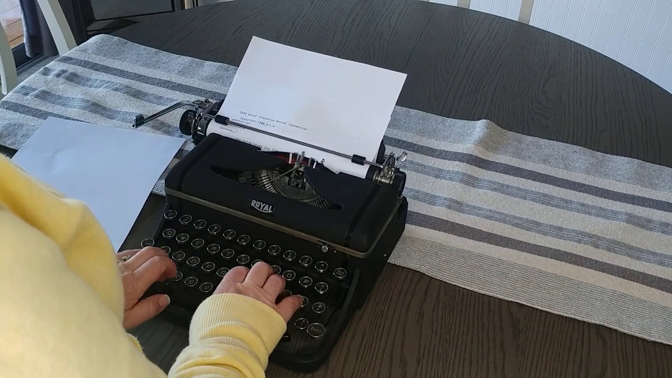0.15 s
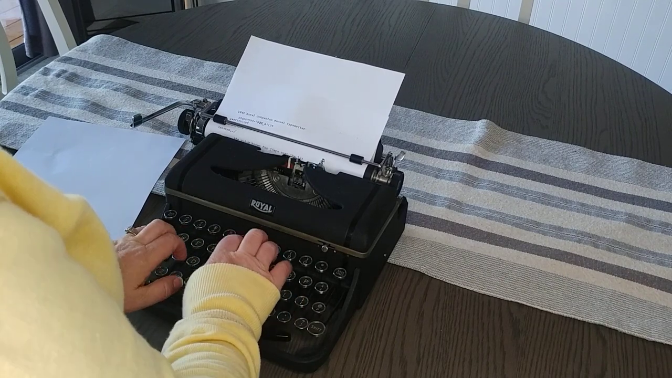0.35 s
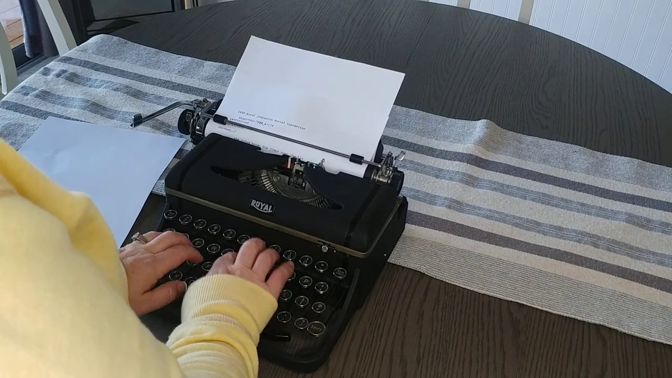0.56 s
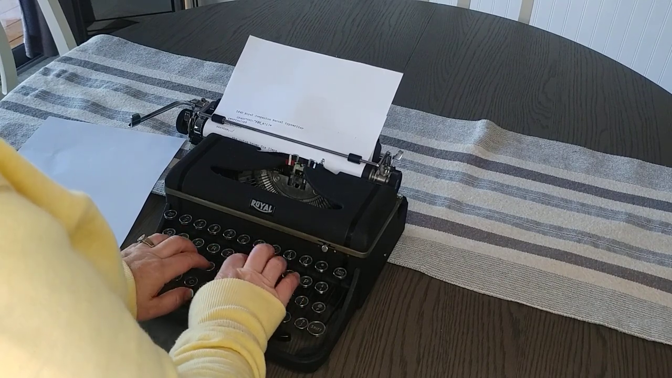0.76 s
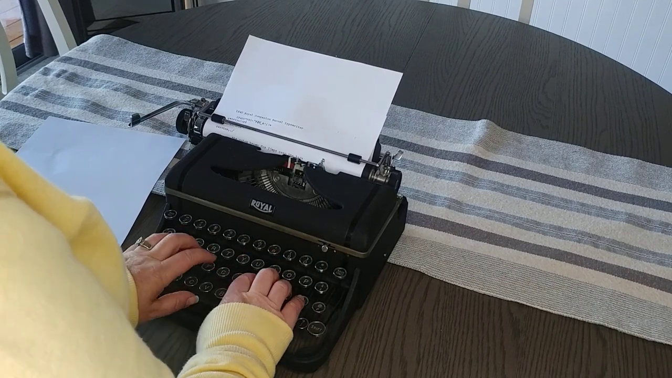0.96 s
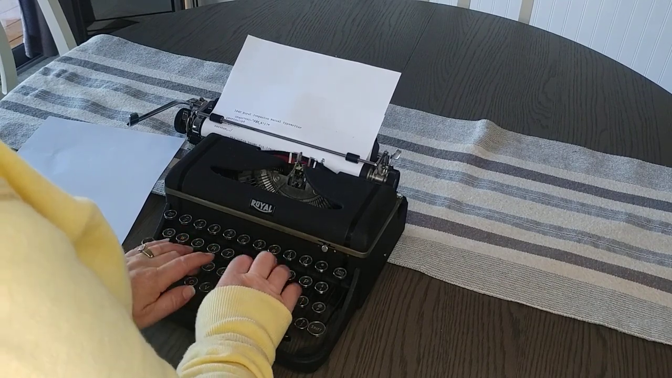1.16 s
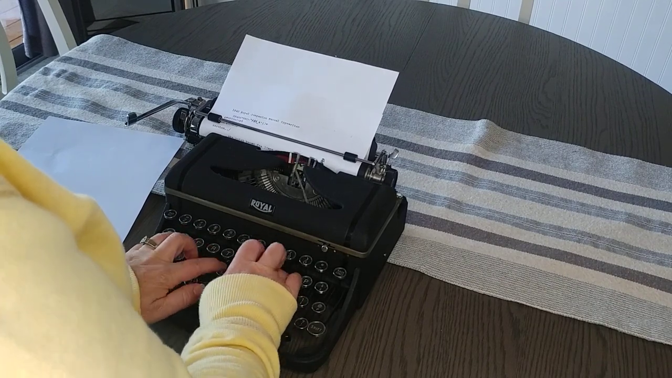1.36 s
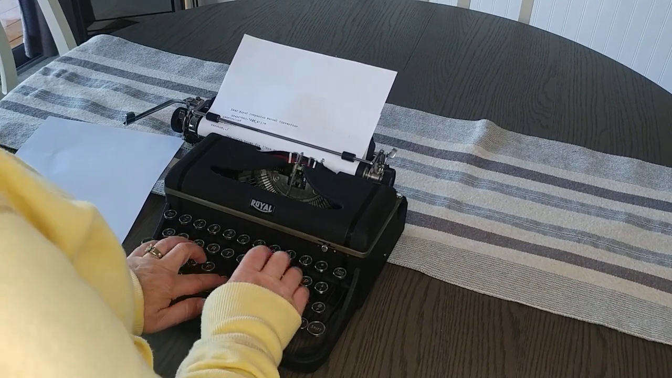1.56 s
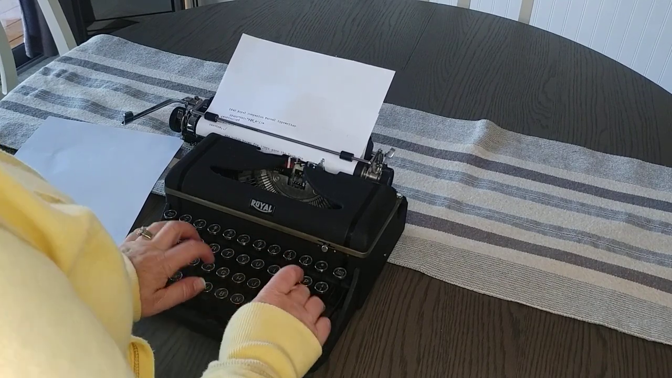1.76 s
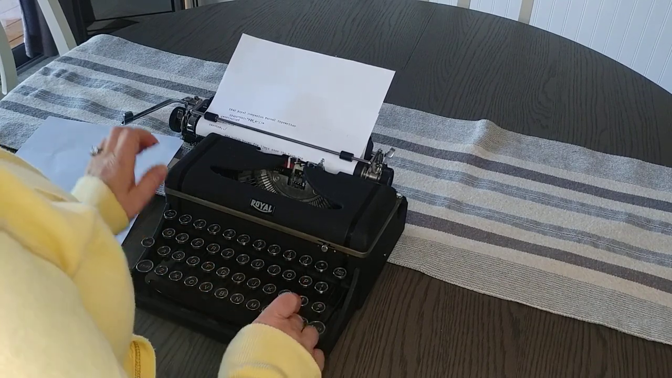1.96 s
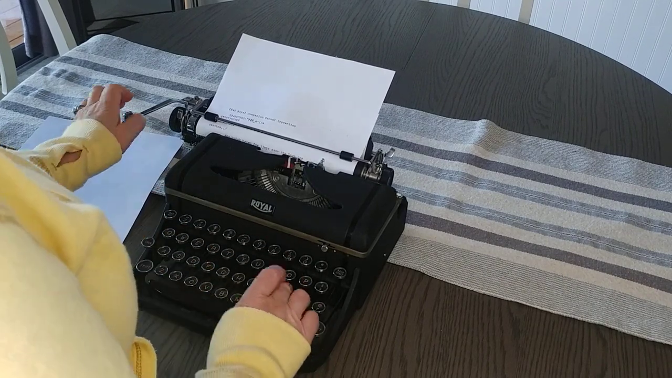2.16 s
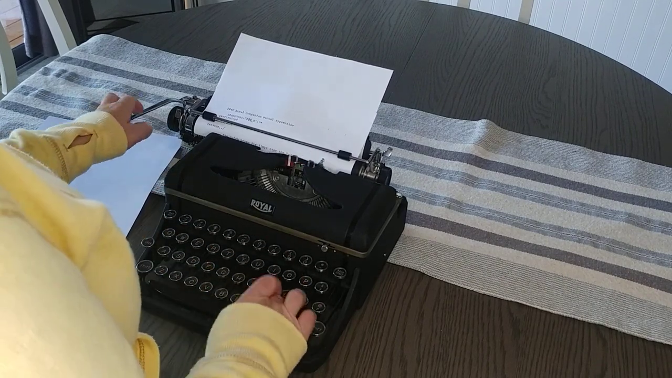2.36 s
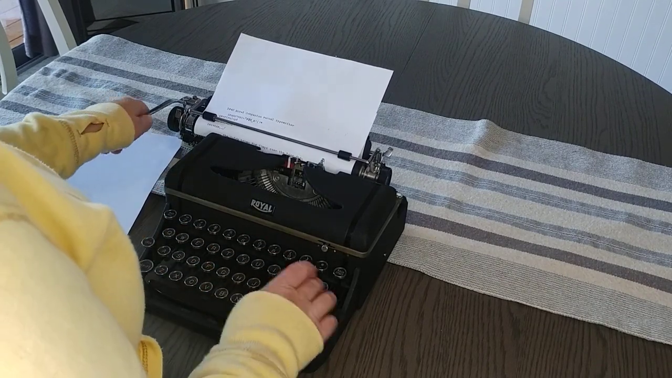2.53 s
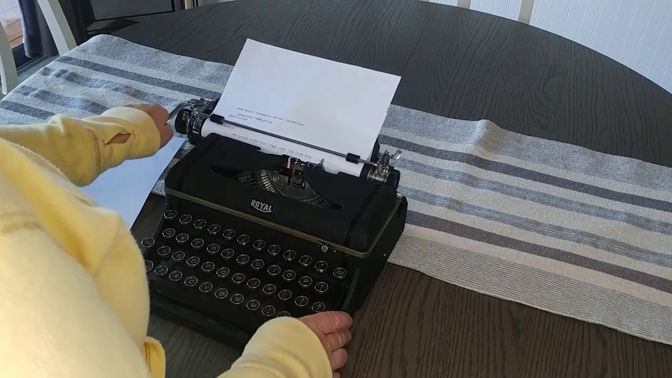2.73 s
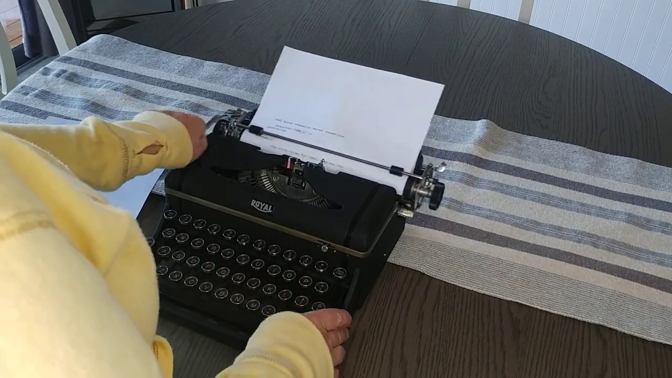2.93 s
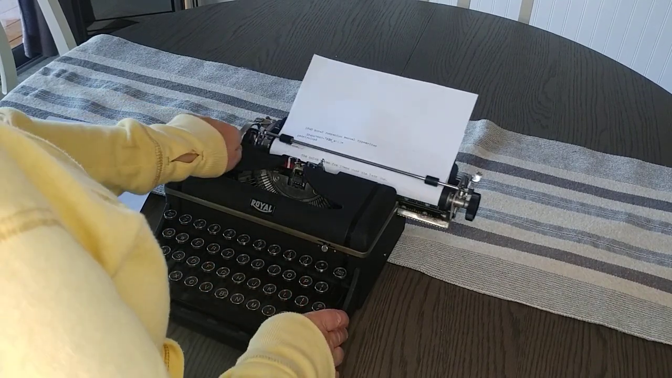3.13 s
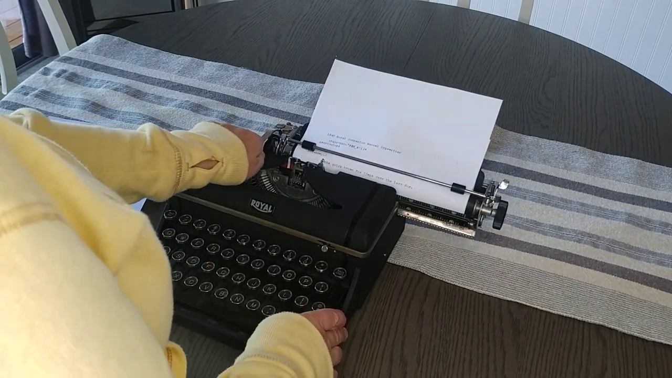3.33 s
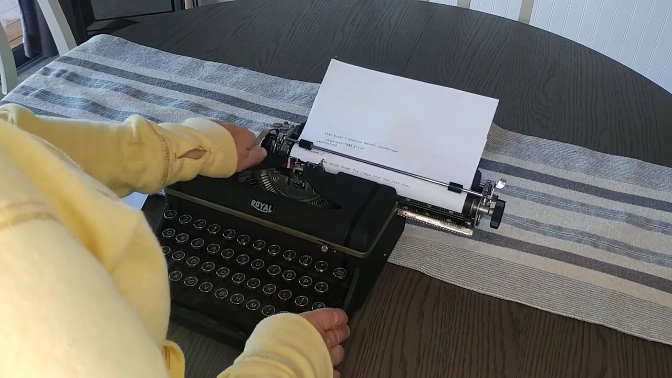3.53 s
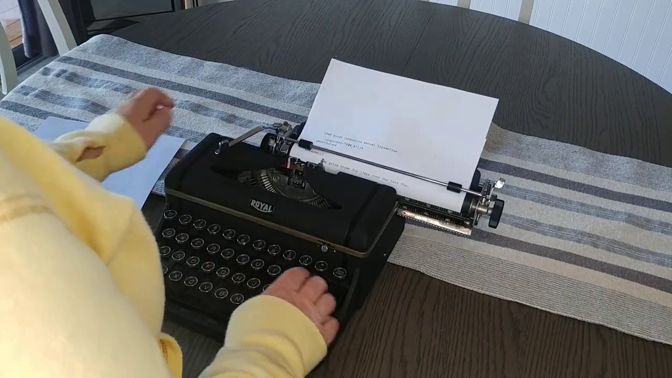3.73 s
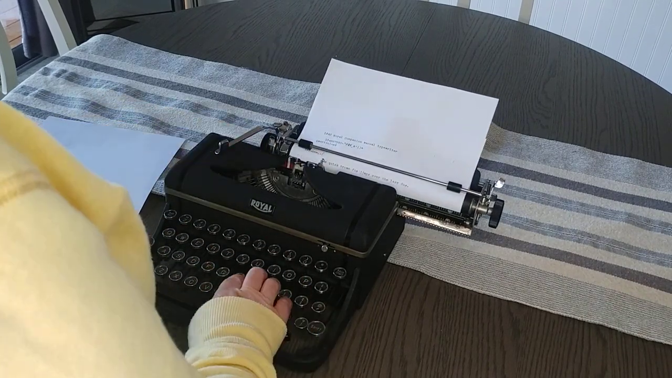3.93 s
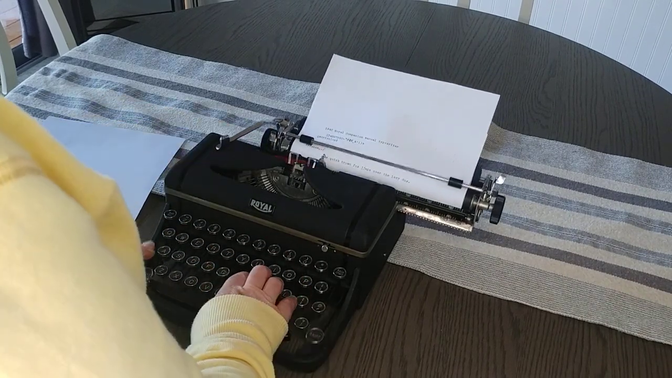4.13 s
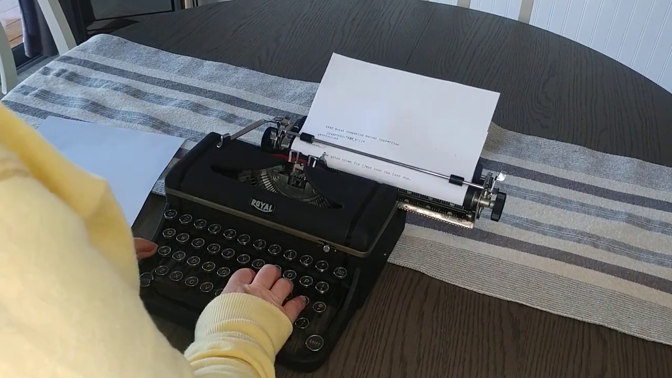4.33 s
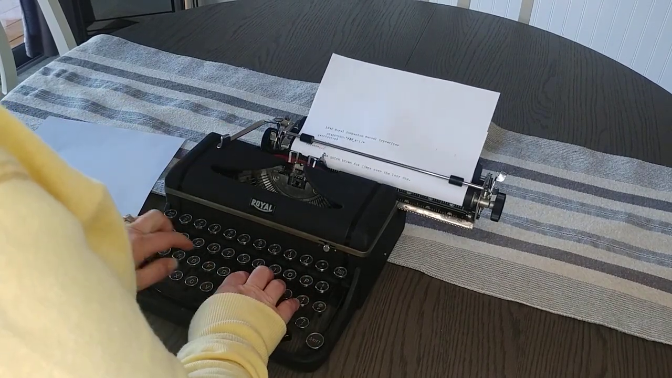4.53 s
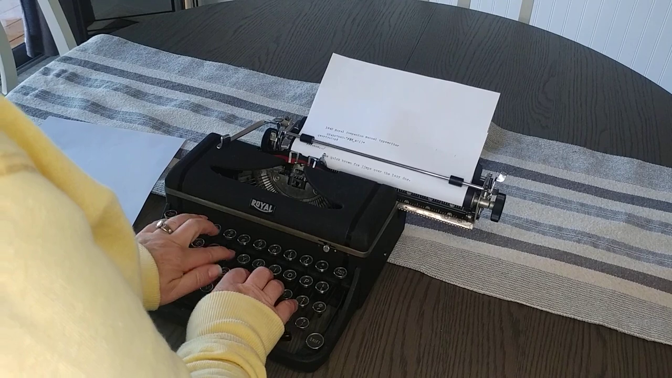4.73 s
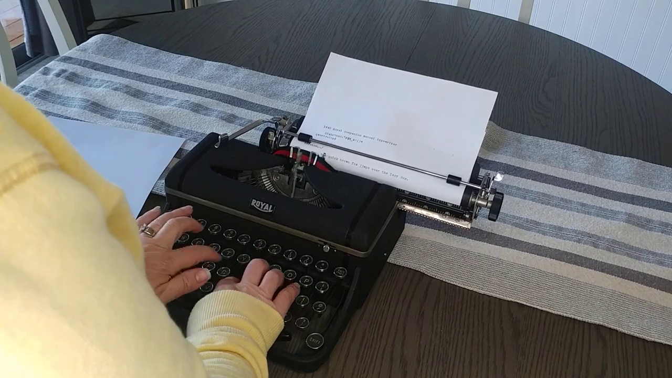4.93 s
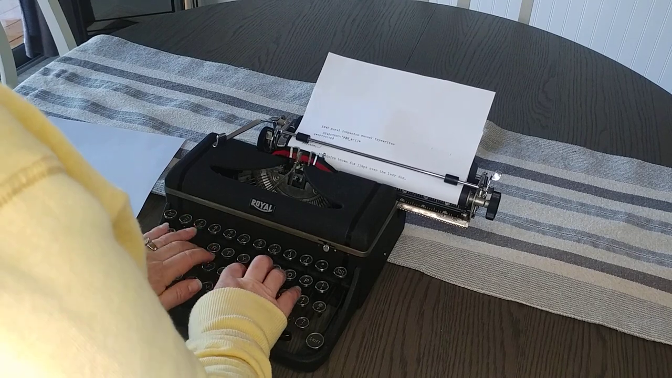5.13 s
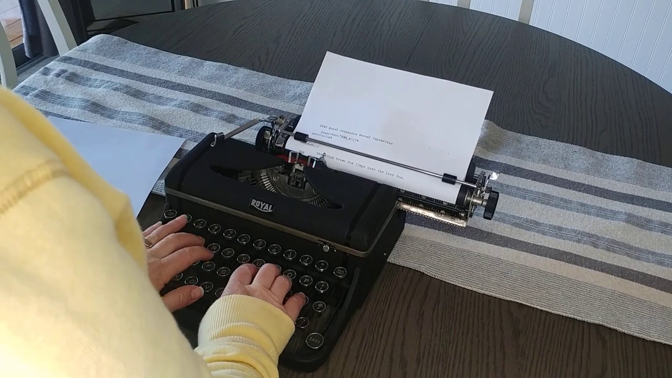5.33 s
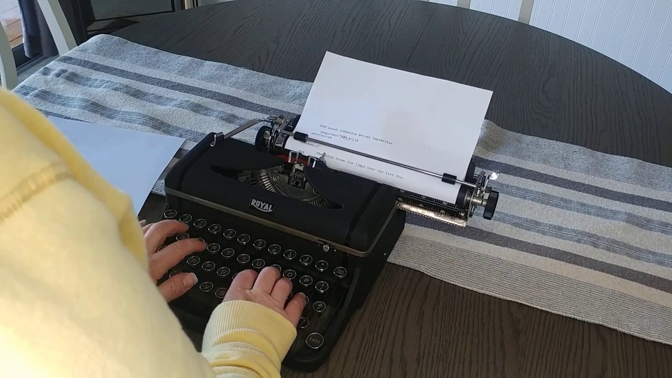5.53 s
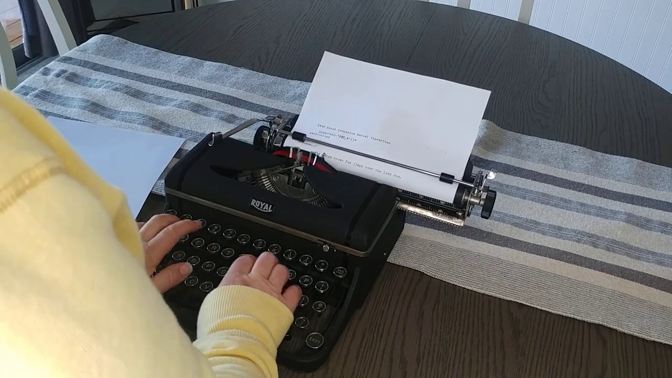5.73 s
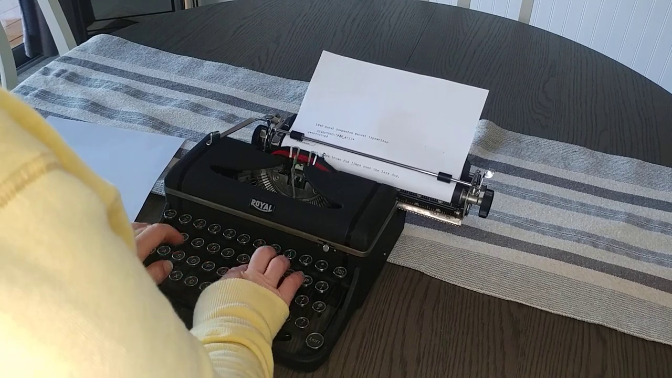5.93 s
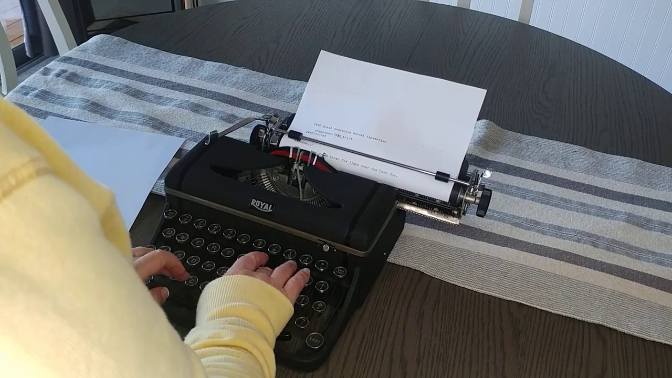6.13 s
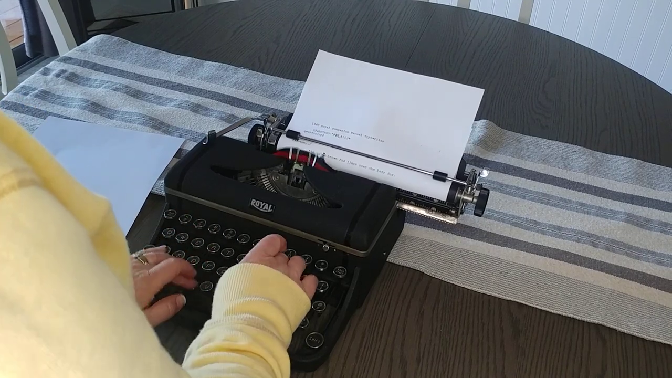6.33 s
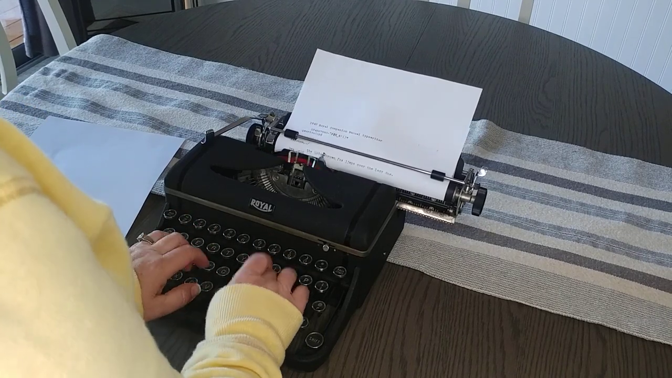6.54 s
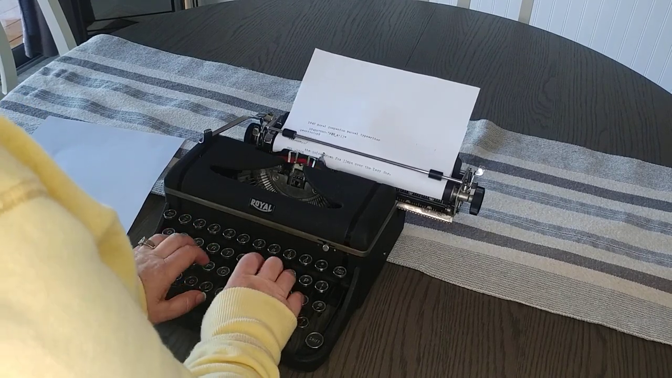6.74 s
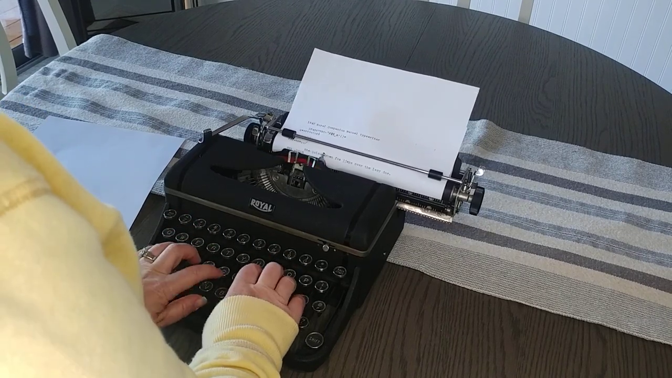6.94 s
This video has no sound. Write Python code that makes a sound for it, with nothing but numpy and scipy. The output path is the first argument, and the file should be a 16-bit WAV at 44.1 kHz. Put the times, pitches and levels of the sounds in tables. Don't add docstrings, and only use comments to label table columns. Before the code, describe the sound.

A manual typewriter clacks in uneven sharp strikes, its carriage is slid back with a soft ratchet, a shift slam, then faster typing resumes.

```python
import sys
import numpy as np
from scipy import signal
from scipy.fft import rfft, irfft
from scipy.io import wavfile
from scipy.ndimage import uniform_filter1d

SR = 44100
rng = np.random.default_rng(int(sys.argv[2]) if len(sys.argv) > 2 else 0)


def rack_gain(trim_db):
    fader = np.asarray(trim_db, float)
    return 10 ** (fader / 20)


def bounce(signal):
    frames = np.transpose(np.atleast_2d(signal))
    limited = np.clip(frames, -1, 1)
    pcm = np.round(limited * 32767).astype(np.int16)
    wavfile.write(sys.argv[1], SR, pcm)


N = 312228
LEAD_S = .1

# (time [s], crack peak [dB], steel over paper slap [dB], frame ring [dB],
# table jolt [dB])
STRIKES = [(0.2484, -2.5, .5, -40.5, -43), (0.6765, 1.2, 2.5, -36, -41), (1.2191, 0, -1.5, -38, -47),
           (1.3829, 2.2, -.6, -38, -47), (1.6326, 1.5, .3, -36.5, -46), (2.3523, -2.5, -10.5, -35.5, -37),
           (4.8543, .3, 3.5, -34, -35), (5.0125, 1.5, 3, -35.5, -37), (5.207, 0, 2.5, -34.5, -42),
           (5.7509, -1.2, 1.5, -34, -41), (5.9782, -1, .6, -34.5, -39), (6.2107, -1.2, 2.2, -34, -44),
           (6.4354, -.5, 1.4, -33.5, -41), (6.658, -0.5, .4, -33.5, -42)]
# (time [s], frame ring [dB], thud [dB], table jolt [dB])
CLUNKS = [(0.063, -30, -47, -42), (0.378, -30, -45, -43), (0.64, -38, -42, -43), (0.789, -30, -49, -42),
          (0.943, -43, -43, -47), (1.094, -31, -42, -43), (1.352, -30, -43, -46), (1.502, -31, -45, -42),
          (1.774, -32, -46, -44), (2.333, -29, -43, -38), (2.444, -32, -45, -45), (3.633, -32, -43, -42),
          (4.103, -46, -51, -48), (4.954, -26, -45, -38), (5.124, -27, -42, -41), (5.359, -27, -46, -41),
          (5.478, -41, -43, -47), (5.657, -29, -41, -42), (5.917, -30, -44, -41), (6.075, -27, -39, -42),
          (6.348, -29, -45, -42), (6.564, -28, -41, -44), (6.774, -29, -43, -46), (6.875, -41, -39, -45),
          (7.047, -29, -40, -44)]
# (frequency [Hz], level [dB], time to fall 60 dB [s])
FRAME = [(286, -14, .08), (330, -12, .07), (382.5, -2, .1), (447.8, -6, .09), (500, -7.5, .07),
         (545, -8, .07), (592, -8, .07), (642, -7.5, .09), (670.7, -1, .1), (710, -7, .07), (780, -11, .06),
         (864, -9, .06), (960, -9, .05), (1087, -9.5, .05), (1220, -12.5, .05), (1554, -18, .05),
         (1830, -24.5, .05)]
# (frequency [Hz], level per Hz [dB])
RATTLE = [(530, -31), (900, -4), (1360, -15), (1780, -4.5), (3270, -4), (4430, -10), (4830, -9),
          (9200, -4.5), (10500, -16), (14800, -16.5), (15900, -22), (16500, -35.5)]
FELT = .62
RIGHT_LAG = 3


def unit(x):
    return x / np.sqrt(np.mean(x ** 2))


def response(spectrum):
    hz, db = np.transpose(spectrum)
    grid_hz = np.linspace(1, SR / 2, 2049)
    log_gain = np.interp(np.log(grid_hz), np.log(hz), db) * np.log(10) / 20
    cepstrum = irfft(log_gain)
    cepstrum[1:2048] *= 2
    cepstrum[2049:] = 0
    taps = irfft(np.exp(rfft(cepstrum)))
    return taps / np.linalg.norm(taps)


def band(x, lo_hz, hi_hz):
    sos = signal.butter(2, [lo_hz, min(hi_hz, .45 * SR)], "band", fs=SR, output="sos")
    return signal.sosfilt(sos, x)


def burst(ms, grain_db=2.5):
    t_ms = np.arange(2048) / SR * 1000
    contacts = rng.standard_normal(2048) * rack_gain(grain_db * rng.exponential(size=2048))
    return unit(contacts) * np.exp(-t_ms / max(ms, .1))


def ring(modes, scatter_db, detune=.012, size=6000, damp=1):
    hz, db, t60 = np.transpose(modes)[:, :, None]
    pitch_chance, level_chance = rng.standard_normal((2, len(modes), 1))
    t = np.arange(size) / SR
    tones = np.sin(2 * np.pi * hz * (1 + detune * pitch_chance) * t)
    fade = np.exp(-np.log(1000) * t / (damp * t60))
    total = np.sum(rack_gain(db + scatter_db * level_chance) * tones * fade, axis=0)
    return total / np.sqrt(np.mean(total[:600] ** 2))


def pushed(body, ms):
    push = burst(ms) * (1 - np.exp(-np.arange(2048) / 260.0))
    return signal.fftconvolve(body, push / np.linalg.norm(push))


def add(track, s, x):
    i = max(int((s + LEAD_S) * SR), 0)
    track[..., i:i + x.shape[-1]] += x[..., :track.shape[-1] - i]


def read(curve):
    s, first, *rest = np.transpose(curve)
    t = np.arange(s[0], s[-1], 1 / SR)
    return [s[0], rack_gain(np.interp(t, s, first))] + [np.interp(t, s, c) for c in rest]


def stereo_noise(size, wide=1.04):
    mid, side = rng.standard_normal((2, size))
    side = wide * signal.lfilter(*signal.butter(1, 911, "high", fs=SR), side)
    return np.array([mid + side, mid - side]) / np.sqrt(2)


def typebars(track):
    # (frequency [Hz], level per Hz [dB])
    crack_colour = [(500, -40), (900, -20), (1500, -17), (2200, -11), (3000, -5), (4200, -3), (5500, -4),
                    (7000, -7), (8300, -2), (9500, 0), (10500, -9), (12500, -17), (15300, -22),
                    (16500, -40)]
    earlier_strike = (-.07, 2, 0, -38, -48)
    pan_db = .6
    slug = response(crack_colour)[:512]
    for s, db, tilt_db, frame_db, _ in [earlier_strike] + list(STRIKES):
        blow = .065 * burst(.7)
        blow[0] += 1
        crack = signal.lfilter(slug, 1, blow)
        crack += ((rack_gain(-tilt_db / 2) - 1) * band(crack, 2500, 5500)
                  + (rack_gain(tilt_db / 2) - 1) * band(crack, 7000, 16000))
        add(track, s + .0006, rack_gain(db + 9.3) * crack * rack_gain([[pan_db / 2], [-pan_db / 2]]))
        frame = ring(FRAME, scatter_db=1.6, damp=FELT)
        add(track, s + .006, rack_gain(frame_db - 1.6) * pushed(frame, 20.0))


def linkage(track):
    # (frequency [Hz], level [dB], time to fall 60 dB [s])
    thud = [(102, -2, 0.1), (130, 0, 0.16), (178.1, 0, .18), (215, -6, 0.12)]
    # (time [s], peak [dB], 1.5-1.9 kHz against peak [dB], length [ms])
    ticks = [(0.1915, -42.5, -13, 2.6), (1.0605, -42, -13, 2.6), (1.0849, -38, -13, 2.6),
             (2.7328, -35, -4, 4), (2.7917, -36.5, -13, 2.6), (3.4047, -37, -20, 2.6),
             (3.5793, -40, -13, 2.6), (3.6262, -41, -18, 2.6), (4.104, -49, 4, 6), (5.478, -41, -13, 2.6),
             (5.6481, -36, -13, 2.6), (5.6555, -31, -13, 2.6)]
    # (time [s], peak [dB], 1.5-1.9 kHz against peak [dB], length
    # [ms])
    take_up = [(.232, -43, -10, 8), (0.6407, -53, -9.5, 10), (0.667, -36, -3.5, 6), (1.208, -41.5, -8.5, 6),
               (2.321, -45, -6.5, 9.3), (2.345, -33, -11, 5), (4.2247, -44, -4, 3.3),
               (4.813, -42.5, -10, 12), (4.845, -33, -2, 6.5), (5.738, -37.5, -5, 7.2),
               (7.025, -38, -16, 8.8)]
    # (time [s], peak [dB], 1.5-1.9 kHz against peak [dB], length
    # [ms])
    snaps = [(3.6805, -27, -18, .6), (4.4748, -33, -9, .8), (3.607, -45, -10, 5)]
    # (time [s], level [dB], frequency [Hz], time to fall 60 dB [s])
    knock = (4.2545, -21, 3200, .02)
    clunk_ms = 24
    steel = response(RATTLE)[:512]
    for s, frame_db, thud_db, _ in CLUNKS:
        rattle_db = -44.5 + .4 * (frame_db + 31)
        frame = ring(FRAME, scatter_db=1.6, damp=FELT)
        add(track, s, rack_gain(frame_db - 7.2) * pushed(frame, clunk_ms))
        add(track, s, rack_gain(thud_db - .6) * pushed(ring(thud, scatter_db=3.0), clunk_ms))
        add(track, s, rack_gain(rattle_db) * signal.lfilter(steel, 1, burst(.9 * clunk_ms)))
    for s, db, low_db, ms in list(ticks) + list(take_up) + list(snaps):
        touch = burst(ms)
        touch[0] += 4.0
        tick = signal.lfilter(steel, 1, touch)
        add(track, s, rack_gain(db - 6.5) * (tick + 6.0 * rack_gain(low_db) * band(touch, 1480, 1900)))
    s, db, hz, t60 = knock
    add(track, s, rack_gain(db - 10) * ring([(hz, 0, t60), (1.06 * hz, -4, t60)], scatter_db=0))


def table_rocking():
    # (frequency [Hz], level [dB], time to fall 60 dB [s])
    legs = [(24, -3, .25), (36, 0, .45), (64, -.5, .35), (86, -1.5, .2)]
    # (time [s], level [dB])
    jolts = [(.445, -41), (2.74, -49), (3.02, -49), (3.18, -50), (3.88, -54), (4.09, -47), (4.25, -24),
             (4.33, -34), (4.49, -36)]
    rocking = np.zeros(N + int(LEAD_S * SR))
    shove = np.hanning(int(15 * SR / 1000))
    for s, *_, db in list(STRIKES) + list(CLUNKS) + list(jolts):
        swing = ring(legs, scatter_db=2.5, size=16000)
        add(rocking, s + .008, rack_gain(db + 8) * signal.fftconvolve(swing, shove / shove.sum()))
    tremor = unit(signal.fftconvolve(rng.standard_normal(N), ring(legs, scatter_db=0))[:N])
    return rack_gain([[.4], [-.4]]) * (rocking[-N:] + rack_gain(-59) * tremor)


def house_hush():
    # (frequency [Hz], level per Hz [dB])
    hush_colour = [(44, -22), (63, 4), (124, -7), (183, -2.5), (235, -9), (339, -14.5), (573, -20.5),
                   (1400, -32), (2590, -32), (4090, -35), (9530, -34), (10700, -42), (15100, -39),
                   (16500, -64)]
    hush = signal.fftconvolve(stereo_noise(N), response(hush_colour)[None], axes=1)[:, :N]
    return rack_gain(-55.5) * unit(hush)


def carriage(track, heard):
    # (time [s], rack level [dB], rail rumble against rack [dB], pawl ring [Hz])
    slide = [(2.785, -62, 3, 9100), (2.824, -48, -6, 9120), (2.97, -42.5, -6, 9360),
             (3.07, -41.5, -9, 9560), (3.13, -49, -6, 9230), (3.18, -44.5, -10, 8340),
             (3.315, -43, -8.5, 8690), (3.375, -53, -4, 8530), (3.415, -68, -3, 8300)]
    # (time [s], teeth per second [1/s])
    teeth = [(2.76, 62), (2.85, 66), (2.95, 124), (3.05, 79), (3.15, 79), (3.3, 80), (3.45, 70)]
    # (frequency [Hz], level per Hz [dB])
    rack_colour = [(2940, -46), (5000, -13), (7240, -11.5), (8040, -2.5), (9380, 1), (10800, -14),
                   (15500, -11.5), (16300, -15), (16500, -51)]
    # (frequency [Hz], level per Hz [dB])
    rail_colour = [(300, -22), (700, -8), (854, -6), (1250, -17), (1820, -5.5), (2020, -7), (3280, -3),
                   (3670, -10), (5500, -10.5), (7150, -38.5), (12100, -120)]
    tooth_share = .8
    s, gain, rail_db, pawl_hz = read(slide)
    size = len(gain)
    teeth_passed = np.cumsum(np.interp(s + np.arange(size) / SR, *np.transpose(teeth))) / SR
    uneven = rack_gain(2.0 * rng.standard_normal(int(N / 200)))
    tooth = uneven[teeth_passed.astype(int)]
    gate = 1 - tooth_share + 5.0 * tooth_share * tooth * np.exp(-(teeth_passed % 1) / .2)
    noise = rng.standard_normal((3, SR))[:, :size]
    rack = signal.fftconvolve(np.sqrt(gate) * noise[0], response(rack_colour))[:size]
    pawl = gate * unit(band(noise[1], 20, 500)) * np.cos(2 * np.pi * np.cumsum(pawl_hz) / SR)
    rail = signal.fftconvolve(np.sqrt(gate) * noise[2], response(rail_colour))[:size]
    add(track, s, gain * (rack_gain(-7.0) * rack + rack_gain(-18.0) * pawl + rack_gain(rail_db - 5.0) * rail))
    both_mics = np.array([pawl, np.roll(pawl, 3 * RIGHT_LAG)])
    add(heard, s, gain * rack_gain([[-1.5], [-4.5]]) * both_mics)


def basket(track):
    # (time [s], scrape [dB], frame against scrape [dB])
    slam = [(4.222, -66, 11), (4.232, -16.5, -12.5), (4.254, -20, 3), (4.282, -38.5, 5), (4.36, -54, 16)]
    # (frequency [Hz], level [dB], time to fall 60 dB [s])
    basket_modes = [(110, -3.5, .08), (140, -4, .08), (166, -2.5, .08), (224, 0.5, .08), (285, 1, .1),
                    (338, -5, .06), (390, -5, .06), (444, 1, .08), (500, -5, .06), (560, -0.5, .07),
                    (608, 0.5, .07), (660.5, -4.5, .08), (720, -6, .06), (804, -16, .05), (907, -20.5, .05)]
    s, gain, frame_db = read(slam)
    grit = rng.standard_normal((2, SR))[:, :len(gain)] * gain
    body = ring(basket_modes, scatter_db=-0.5, damp=.9)
    body = body / np.linalg.norm(body)
    add(track, s, rack_gain(-.4) * signal.fftconvolve(grit[1] * rack_gain(frame_db), body))
    add(track, s, rack_gain(-11.8) * signal.fftconvolve(grit[0], response(RATTLE)))


def room(echoes):
    # (frequency [Hz], time to fall 60 dB [s], level [dB])
    tail_bands = [(150, .45, -30), (400, .4, -32), (800, .4, -30.5), (1400, .43, -26.5), (2200, .48, -25),
                  (3990, .48, -24), (6900, .44, -24), (9700, .41, -23), (14300, .38, -21.5)]
    direct_ms = .55
    size = int(.6 * SR)
    t = np.arange(size) / SR
    middles = [np.sqrt(a[0] * b[0]) for a, b in zip(tail_bands, tail_bands[1:])]
    edges = [60] + middles + [19000]
    tail = np.zeros((2, size))
    for (_, t60, db), lo, hi in zip(tail_bands, edges, edges[1:]):
        tail += rack_gain(db - 60 * t / t60) * band(stereo_noise(size), lo, hi)
    early = np.zeros((2, size))
    for ms, *db in [(direct_ms, -3.5, -3.5)] + list(echoes):
        smear = .28 * rng.standard_normal((2, 256)) * np.exp(-np.arange(256) / 28.0)
        smear[:, 0] += .45
        i = int(ms * SR / 1000)
        early[:, i:i + 256] += rack_gain(db)[:, None] * smear
    out = band(early, 1300, 19000) + tail * (1 - np.exp(-(t / 0.011) ** 2))
    out[:, int(direct_ms * SR / 1000)] += 1.55
    out[1] = np.roll(out[1], RIGHT_LAG)
    return out


def quieten(x):
    treble = x - signal.filtfilt(*signal.butter(2, 1100, fs=SR), x)
    power = uniform_filter1d(np.mean(treble ** 2, axis=0), int(24 * SR / 1000))
    under_db = -46 - 10 * np.log10(np.abs(power) + 1e-12)
    cut_db = np.clip(1.1 * under_db, 0, 11)
    return x + (rack_gain(-cut_db) - 1) * treble


def scene():
    # (delay [ms], left [dB], right [dB])
    echoes_before = [(1.4, -1.5, -2.5), (5.196, -4.5, -2.5), (6.94, -8.5, -7), (9.91, 1, -4.5),
                     (10.95, -6.5, -13.5), (12.32, -3, -1.5), (14.4, -3.5, -4.5), (15.92, -2.5, -7.5),
                     (22.92, -14, -2.5), (23.97, -6.5, -15), (26.1, -5, -11.5), (38.14, -16, -7.5)]
    # (delay [ms], left [dB], right [dB])
    echoes_after = [(1.5, -1.5, -7), (5.196, -8.5, -13.5), (6.304, -6, -3), (7.43, -8, -9),
                    (9.816, 3.5, -8.5), (12.145, -3.5, -5), (14.03, -7, -9.5), (15.7, -8, -11.5),
                    (27.5, -10.5, -17)]
    # (from [Hz], to [Hz], change [dB])
    returned = [(1200, 1900, 2.5), (2600, 3700, -3.5), (10800, 16000, 3)]
    return_s = 3.0
    lead = int(LEAD_S * SR)
    machine, heard = np.zeros((2, 2, N + lead))
    typebars(machine)
    linkage(machine)
    carriage(machine, heard)
    basket(machine)
    cut = int(return_s * SR) + lead
    before, after = machine[:, :cut], machine[:, cut:]
    shading = sum((rack_gain(db) - 1) * band(after, lo, hi) for lo, hi, db in returned)
    add(heard, -LEAD_S, signal.fftconvolve(before, room(echoes_before), axes=1))
    add(heard, return_s, signal.fftconvolve(after + shading, room(echoes_after), axes=1))
    return heard[:, lead:] + table_rocking() + house_hush()


def roll_off(x):
    return signal.sosfilt(signal.butter(12, 16710, fs=SR, output="sos"), x)


def record(dry):
    dry = quieten(dry)
    clipped = .9 * dry / (.9 ** 4 + np.abs(dry) ** 4) ** .25
    smooth = signal.sosfilt(signal.butter(6, 16800, fs=SR, output="sos"), clipped)
    return roll_off(smooth)


dry = scene()
out = record(dry)
bounce(out)
```